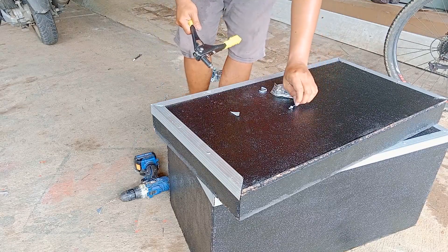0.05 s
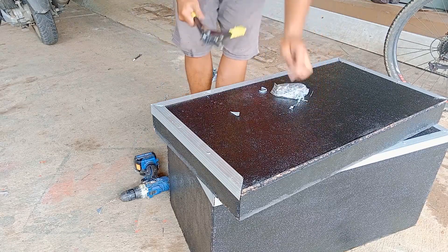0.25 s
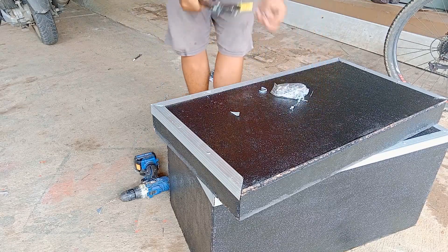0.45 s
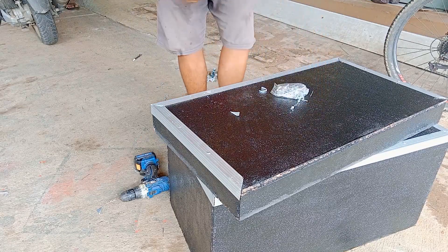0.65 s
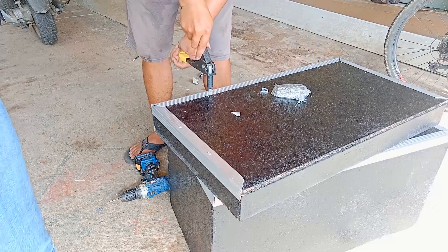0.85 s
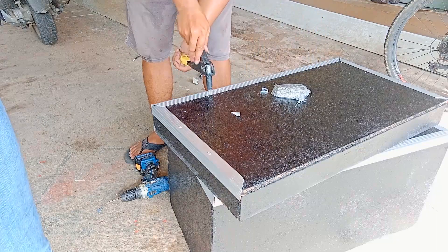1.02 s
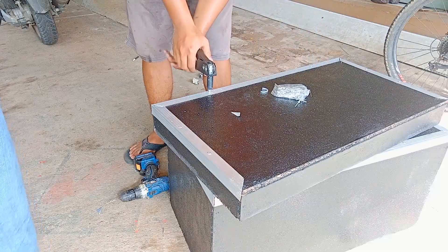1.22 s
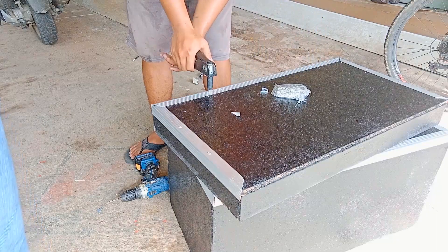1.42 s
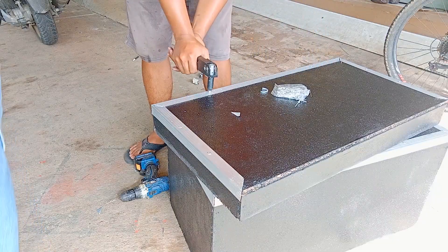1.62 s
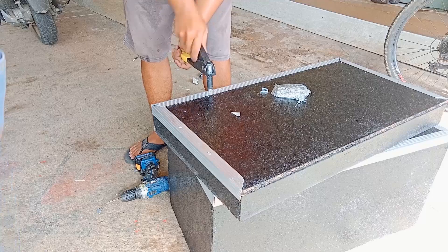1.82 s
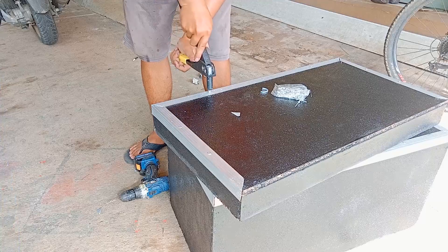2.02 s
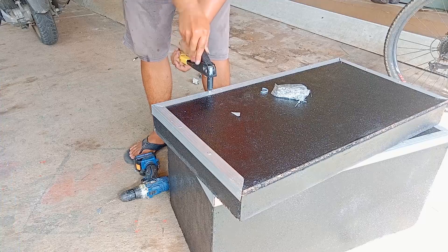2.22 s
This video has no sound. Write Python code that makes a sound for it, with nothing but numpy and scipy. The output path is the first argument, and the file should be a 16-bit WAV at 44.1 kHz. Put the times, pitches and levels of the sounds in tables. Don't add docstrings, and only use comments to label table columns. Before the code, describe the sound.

Hard steel clacks and hollow boxy knocks as a hand riveter works on a trimmed plywood case

```python
import sys
import numpy as np
from scipy import signal
from scipy.io import wavfile
from scipy.ndimage import uniform_filter1d

SR = 44100
rng = np.random.default_rng(int(sys.argv[2]) if len(sys.argv) > 2 else 0)


def dump_mix(stems):
    frames = np.atleast_2d(stems).T
    limited = np.clip(frames, -1, 1)
    pcm = np.round(limited * 32767).astype(np.int16)
    wavfile.write(sys.argv[1], SR, pcm)


def boost(x):
    u = np.asarray(x, float) / 20
    return 10 ** u


N = 99225

# (time [s], peak level [dB], boom [dB], trim [dB], contact time [s])
KNOCKS = [(0.022, -24.5, -40, 4, 0.0023), (0.199, -9, -10.5, -12, 0.00079),
          (0.4065, -9.5, -4, -9.5, 0.00024), (0.4475, -13, -20, -0.5, 0.00099),
          (0.477, 1.5, 3.5, -9, 0.00024), (0.732, -12, -6, -4, 0.0032), (0.751, -12.5, -27, -8, 0.0003),
          (0.767, -20.5, -8.5, -4.5, 0.00083), (0.888, -12, -6, -11, 0.00047),
          (1.235, -20, -3, -17, 0.0018), (1.443, -36, -0.5, -29, 0.00095), (1.514, -6.5, -22, -12, 0.00028),
          (1.532, -16.5, -55, 1, 0.00065), (1.569, -15, -6.5, -17, 0.0004),
          (1.6705, -2.5, -43, -6, 0.00028), (1.676, -8, -29, 0, 0.0023), (1.699, -16.5, -12, -6, 0.0014)]
# (time [s], level [dB], pitch [Hz], T60 [s])
PINGS = [(.479, -4.5, 241, 0.09), (.48, -12, 442.8, 0.22), (.705, -29, 559.6, 0.41),
         (.772, -22.5, 444.4, 0.74), (1.24, -29.5, 123, 0.15), (1.54, -26, 434, 0.43),
         (1.676, -17.5, 727, 0.033), (1.954, -16, 877, 0.14), (.2, -28.5, 147.3, 0.39),
         (.408, -22, 144.4, .2), (.485, -23, 143.4, 0.2), (.735, -22.5, 145.4, 0.28),
         (1.575, -19, 140, 0.1), (1.7, -25.5, 150.4, 0.24), (.8, -27.5, 273.7, 0.36), (.06, -31, 413, 0.23),
         (1.72, -35, 254, 0.47)]
# (time [s], peak level [dB], ring [dB], snap [dB], favoured pitch [Hz])
CLACKS = [(0.0091, -27, -2.5, -21.5, 1580), (0.1745, -24, -13.5, -17.5, 1900),
          (0.1973, -24, -6.5, -14, 1960), (0.2042, -17.5, -6, -7, 1570), (0.4753, -8.5, -7.5, -15, 1800),
          (1.1743, -20, -5, -33, 1750), (1.2325, -26, -5.5, -37, 1400), (1.3074, -19.5, -17, -23, 2340),
          (1.4894, -31, 2.5, -13, 1480), (1.6708, -7.5, -2, -19.5, 1640), (1.902, -33.5, 5, -7.5, 2760),
          (1.9255, -17, -13.5, -23, 2070), (1.9403, -14.5, -6.5, -29, 3290), (1.956, -5, -11, -10, 2150),
          (2.1771, -19, -11.5, -17, 3170), (2.1817, -18.5, -9.5, -13, 2900)]
# (time [s], peak level [dB])
TICKS = [(0.028, -29.5), (0.1496, -52), (0.3997, -22), (0.7655, -19.5), (0.8724, -56), (0.8906, -23),
         (1.16, -34), (1.192, -52), (1.218, -27), (1.3134, -60), (1.5125, -18), (1.8515, -26),
         (1.8891, -32), (1.9327, -17), (2.1215, -27)]
# (time [s], level [dB], decay [s], centre [Hz])
RATTLES = [(.130, -44, 0.0045, 706), (.174, -30.5, 0.024, 1800), (.2005, -20, 0.0065, 1470),
           (.2045, -16, 0.0085, 1620), (.2065, -34, 0.027, 3050), (.2095, -26.5, 0.014, 1100),
           (.364, -38, .006, 750), (.399, -31, 0.0065, 2470), (.4068, -16.5, 0.0084, 1750),
           (.412, -19, 0.002, 2680), (.4485, -31, 0.0028, 810), (.463, -25, .008, 3000),
           (.4755, -14.5, 0.0051, 1510), (.483, -25, 0.016, 2840), (.587, -20, 0.013, 1060),
           (.699, -32, 0.0059, 590), (.712, -23, 0.013, 610), (.719, -27, 0.0026, 2930),
           (.745, -23, 0.0054, 1510), (.795, -14.5, 0.0063, 510), (.826, -31.5, .006, 690),
           (.886, -29, 0.014, 1940), (.901, -31, 0.0086, 800), (1.3075, -25, 0.0025, 2850),
           (1.519, -27, 0.0081, 3240), (1.534, -14, 0.0036, 1570), (1.54, -25, 0.016, 1020),
           (1.585, -19, .006, 865), (1.6765, -4, 0.0052, 810), (1.680, -18.5, 0.0048, 3340),
           (1.898, -33, 0.0059, 2570), (1.9545, -22.5, 0.0083, 880), (1.174, -30.5, .008, 1070),
           (1.232, -36, 0.009, 1170), (1.487, -24, 0.003, 796), (1.855, -35, .012, 800),
           (1.925, -43, 0.012, 890), (1.924, -24, 0.0045, 2620), (1.9325, -34, .004, 3000),
           (1.9485, -16, 0.0064, 3030), (1.966, -18.5, 0.012, 2580)]
# (start [s], length [s], case [dB], trim [dB], hiss [dB])
STROKES = [(0, 0.1, -27.5, -39, -59), (.15, 0.073, -30.5, -39, -49.5), (.35, 0.19, -29.5, -35.5, -51.5),
           (.4, 0.019, -18, -46, -33.5), (.582, 0.049, -30.5, -30, -25.5), (.7, 0.061, -23.5, -28, -35),
           (.82, 0.042, -31.5, -29, -44.5), (1.08, 0.17, -43.5, -49.5, -50.5),
           (1.43, 0.11, -38.5, -37, -52), (1.515, 0.0077, -22, -15.5, -66), (1.935, 0.072, -53, -66, -29),
           (2.05, 0.19, -51.5, -58, -42)]
# (start [s], length [s], level [dB], pitch [Hz], glide [Hz])
SQUEAKS = [
    (.674, 0.042, -39, 7450, 24),
    (.706, 0.016, -34.5, 8080, 57),
    (.73, 0.03, -62, 8000, -200),
    (1.13, 0.043, -39.5, 845, -13),
    (2.132, 0.012, -38, 7120, 0),
]

# (level [dB], T60 [s])
CASE_HZ = [140, 156, 203, 233, 253, 280, 307, 385]
CASE_RING = [(-4.5, 0.56), (-2.5, 0.28), (-9, 0.034), (8.5, 0.19), (-0.5, 0.22), (-7.5, 0.72), (-7, 0.15),
             (-0.5, 0.066)]
# (level [dB], T60 [s])
TRIM_HZ = [415, 480, 555, 565, 635, 720, 753, 1022, 1068, 1225, 1434, 1563]
TRIM_RING = [(-6, 1), (-3, 0.72), (3, 0.21), (4, 0.3), (-27, 0.21), (0.5, 0.44), (13, 0.11), (-3.5, 0.85),
             (10.5, 0.24), (1, 0.094), (-6, 0.14), (8.5, 0.18)]
# (pitch [Hz], level [dB], T60 [s])
TOOL_MODES = [(1890, 14.5, 0.022), (2069, -1, 0.14), (2870, -5, 0.21), (2727, 2, 0.16), (3003, 27.5, 0.017),
              (3485, 11, 0.26), (3640, -19, 0.05), (4200, -62, .15)]
# (frequency [Hz], level [dB])
TRIM_CROWD = [(120, -48.5), (250, -3), (750, 2.5), (1500, -4), (3500, -17.5), (9000, -62)]
TOOL_CROWD = [(880, -71), (1500, 4), (2200, 4.5), (6000, -25.5), (7800, -92), (13200, -120)]
# (frequency [Hz], level [dB])
SNAP = [(500, -97), (1500, -81), (3000, 16.5), (6000, 3), (16000, -0.5)]
HISS = [(200, -46), (900, 2.5), (3000, 9), (6000, -3), (16000, -9)]
# (frequency [Hz], T60 [s])
ROOM_T60 = [(100, 0.21), (300, 0.39), (1000, 0.26), (4000, 0.34), (12000, 0.25)]
# (frequency [Hz], level [dB])
AIR = [(15, -108), (45, -5.5), (175, -0.5), (335, -20), (439, -8), (591, -13), (754, -13), (2220, -18.5),
       (16000, -54)]
MIC = [(40, -26), (110, 0), (4200, -3.5), (6200, -8), (8400, 0.5), (12200, -14.5), (15000, -2),
       (15600, -13), (16200, -48)]

SCENE_CHANGE_S = 1.868
SLIP_DB = 3


def knock(db, boom_db, trim_db, contact_s):
    boom = np.convolve(push(0.035 * contact_s), case())
    edge = np.convolve(push(0.14 * contact_s), trim())
    return boost(db) * (boost(boom_db + 24.5) * boom + boost(trim_db + 22.5) * edge)


def push(length_s):
    t = np.arange(600) / SR / max(length_s, 5e-5)
    force = t * np.exp(-t)
    return force / force.sum()


def case():
    t = np.arange(SR // 2) / SR
    swing_up = 1 - np.exp(-t / 0.0031)
    return ring(np.c_[CASE_HZ, CASE_RING], damp=0.45) * swing_up


def trim(loose_db=0):
    modes = np.c_[TRIM_HZ, TRIM_RING]
    return ring(modes, damp=0.62, crowd=TRIM_CROWD, crowd_t60=0.083, crowd_db=2 + loose_db)


def ring(modes, damp, crowd=None, crowd_t60=0.1, crowd_db=-60):
    t = np.arange(SR // 2) / SR
    hz, db, t60 = np.transpose(modes)[:, :, None]
    spot_db = 2.5 * rng.standard_normal(hz.shape)
    level = boost(db + spot_db - 60 * t / (damp * t60))
    out = unit((level * np.sin(2 * np.pi * hz * t)).sum(0))
    if crowd is not None:
        burst = rng.standard_normal(len(t)) * boost(-60 * t / crowd_t60)
        out = out + boost(crowd_db) * unit(colour(burst, crowd))
    return out


def ping(db, hz, t60):
    t = np.arange(SR // 2) / SR
    flutter = 0.45
    shake = rng.standard_normal(len(t))
    for _ in range(2):
        shake = uniform_filter1d(shake, 600)
    shake = evened(shake)
    phase = 2 * np.pi * hz * t + flutter * shake
    rise = np.minimum(t * hz / 1.5, 1)
    fall = boost(-60 * t / t60)
    mode = (1 + 0.27 * flutter * shake[::-1]) * np.sin(phase)
    neighbour = 1.19 * fall * np.sin(1.06 * phase)
    return boost(db) * rise * fall * (mode + neighbour)


def clack(db, ring_db, snap_db, hz):
    favour = [(f, -5.5 * np.log2(f / hz) ** 2) for f in np.geomspace(400, 12000, num=12)]
    handles = ring(TOOL_MODES, damp=0.4, crowd=TOOL_CROWD, crowd_t60=0.051, crowd_db=3)
    handles = unit(colour(handles, favour))
    out = boost(ring_db + 23.0) * np.convolve(contact(0.00017), handles)
    snap = colour(contact(0.0057), SNAP)
    add(out, 0, boost(snap_db + 25.5) * snap)
    return boost(db) * out


def contact(decay_s):
    t = np.arange(2000) / SR
    chatter = unit(rng.standard_normal(len(t)) * np.exp(-t / max(decay_s, 1e-4)))
    return unit(chatter + 0.59 * (t == 0))


def tick(db):
    return boost(db + 6.0) * colour(contact(0.0032), SNAP)


def rattle(db, decay_s, hz):
    t = np.arange(SR // 16) / SR
    band = [(f, max(-10.5 * np.log2(f / hz) ** 2, -60)) for f in np.geomspace(100, 16000, num=16)]
    shape = np.minimum(t / 0.0004, 1) * np.exp(-t / max(decay_s, 1e-3))
    return boost(db) * evened(colour(uneven_slips(len(t)), band)) * shape


def uneven_slips(count):
    force = rng.standard_normal(count)
    return force * boost(SLIP_DB * np.minimum(rng.exponential(1, count), 4))


def stroke(length_s, case_db, trim_db, hiss_db):
    t = np.arange(SR // 2) / SR
    slipping = rng.random(len(t)) < 2500 / SR
    slips = evened(uneven_slips(len(t)) * slipping)
    rise, fall = np.minimum(t / 0.0025, 1), np.exp(-np.maximum(t - length_s, 0) / 0.025)
    shape = rise * fall
    hiss = evened(colour(0.9 * slips + rng.standard_normal(len(t)), HISS)) * shape
    body = boost(case_db) * case() + boost(trim_db - 6) * trim(loose_db=1)
    return signal.fftconvolve(slips * shape, body)[:len(t)] + boost(hiss_db) * hiss


def squeak(length_s, db, hz, glide_hz):
    t = np.arange(0, length_s, 1 / SR)
    drift = uniform_filter1d(rng.standard_normal((2, SR // 4)), 50, axis=1)
    waver, grain = drift[:, :len(t)]
    pitch = (hz + glide_hz * t / length_s) * (1 + 0.08 * waver)
    whistle = np.sin(2 * np.pi * np.cumsum(pitch) / SR)
    return boost(db + 2.5) * np.sqrt(np.sin(np.pi * t / length_s)) * (1 + 4 * grain) * whistle


def room(x):
    taps = np.zeros(SR // 2)
    slots = np.arange(round(0.0082 * SR), len(taps) - 20, 20)
    at = slots + rng.integers(0, 20, len(slots))
    taps[at] = rng.choice([-1.0, 1.0], len(slots))
    hz, t, bands = signal.stft(taps, SR, nperseg=256)
    decay = boost(-60 * t / read(ROOM_T60, hz)[:, None])
    reply = signal.istft(bands * decay, SR, nperseg=256)[1]
    return signal.fftconvolve(x, unit(reply))[:N]


def air():
    return boost(-49) * evened(colour(rng.standard_normal(N), AIR))


def read(points, hz):
    f, value = np.transpose(points)
    return np.interp(np.log(hz + 1), np.log(f + 1), value)


def colour(x, points):
    log_gain = np.log(boost(read(points, np.fft.rfftfreq(4096, 1 / SR))))
    log_gain = np.r_[log_gain, log_gain[-2:0:-1]]
    phase = -signal.hilbert(log_gain).imag
    response = np.fft.ifft(np.exp(log_gain + 1j * phase)).real[:2048]
    return signal.oaconvolve(x, response)[:len(x)]


def evened(x):
    return x / np.sqrt(np.mean(x ** 2) + 1e-20)


def unit(x):
    return x / np.linalg.norm(x)


def add(mix, start_s, sound):
    part = mix[round(start_s * SR):][:len(sound)]
    part += sound[:len(part)]


def scene():
    parts = np.zeros((2, N))
    layers = ((KNOCKS, knock), (PINGS, ping), (CLACKS, clack), (TICKS, tick),
              (RATTLES, rattle), (STROKES, stroke), (SQUEAKS, squeak))
    for events, source in layers:
        for start_s, *settings in events:
            add(parts[int(start_s > SCENE_CHANGE_S)], start_s, source(*settings))
    before, after = (part + boost(-7) * room(part) for part in parts)
    gate = np.clip((SCENE_CHANGE_S - np.arange(N) / SR) / 0.0015, 0, 1)
    return (colour(before * gate + after, MIC) + air())[None]


def low_pass(x):
    return signal.sosfilt(signal.butter(12, 16830, fs=SR, output="sos"), x)


def record(dry):
    mix = np.tanh(dry / 1.284) * 1.172
    return low_pass(mix)


dry = scene()
out = record(dry)
dump_mix(out)
```